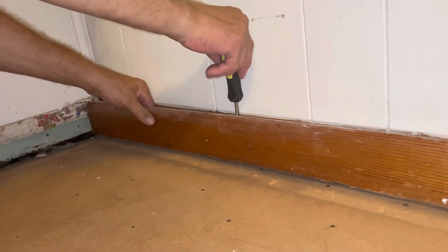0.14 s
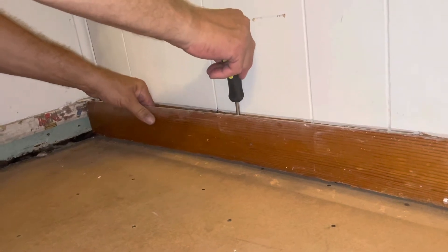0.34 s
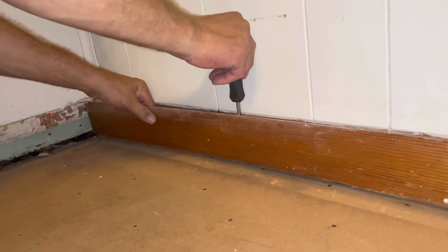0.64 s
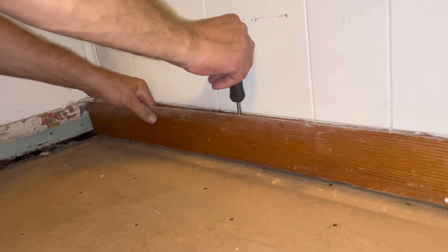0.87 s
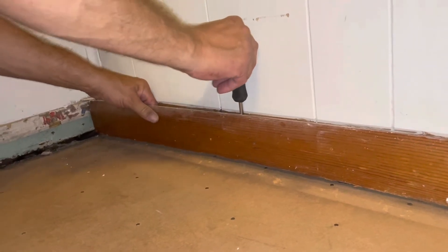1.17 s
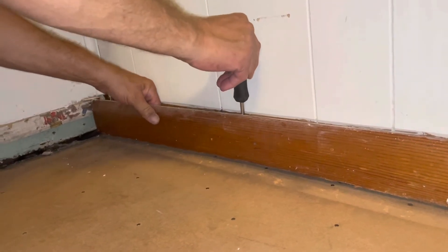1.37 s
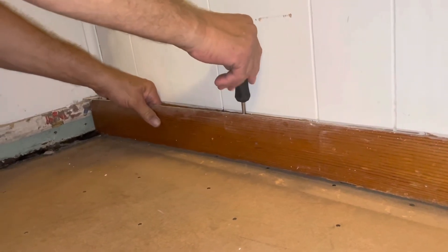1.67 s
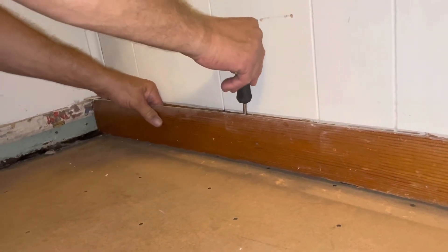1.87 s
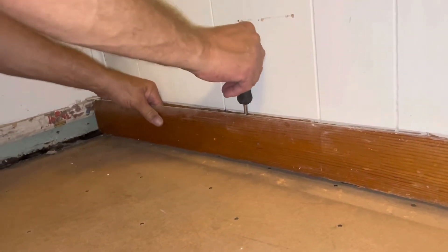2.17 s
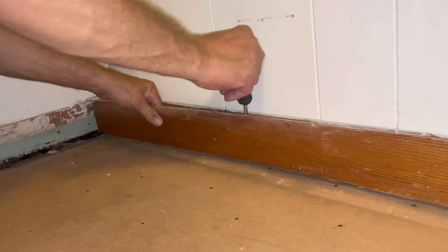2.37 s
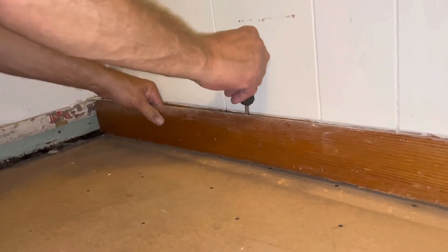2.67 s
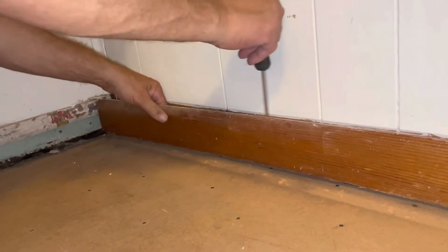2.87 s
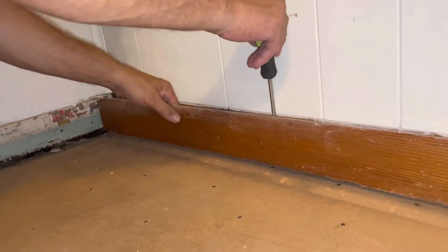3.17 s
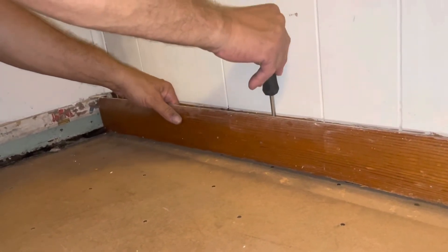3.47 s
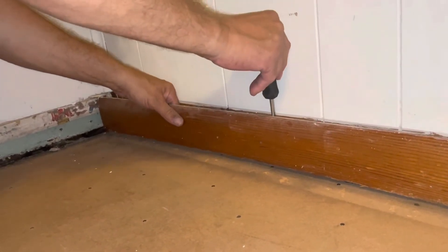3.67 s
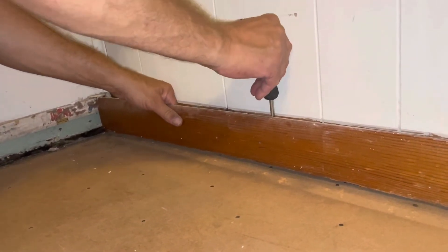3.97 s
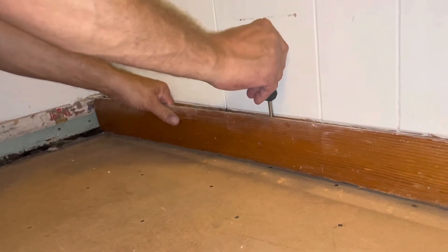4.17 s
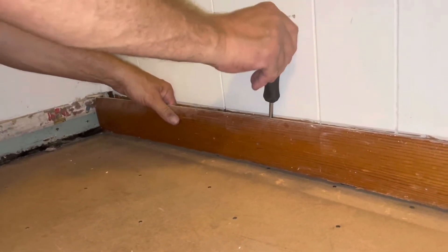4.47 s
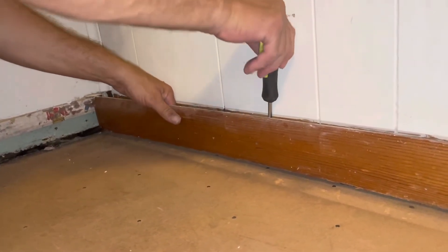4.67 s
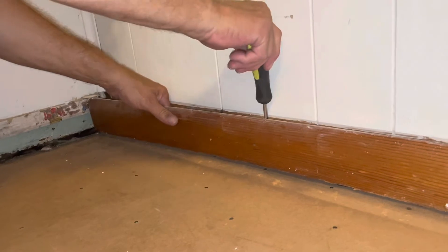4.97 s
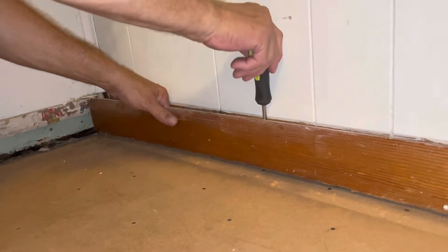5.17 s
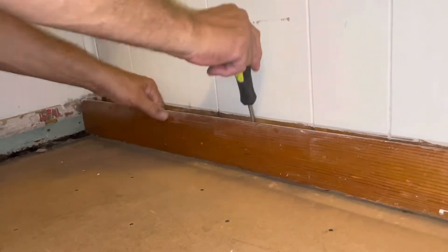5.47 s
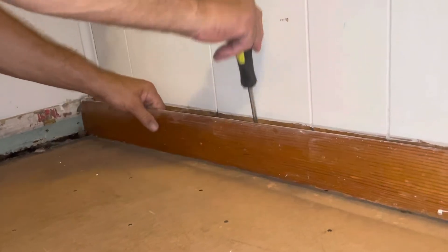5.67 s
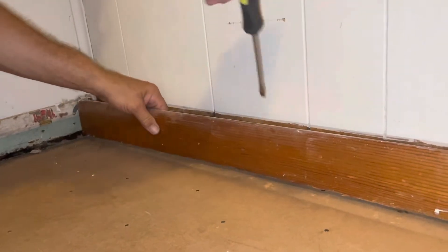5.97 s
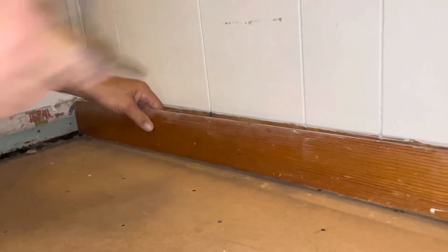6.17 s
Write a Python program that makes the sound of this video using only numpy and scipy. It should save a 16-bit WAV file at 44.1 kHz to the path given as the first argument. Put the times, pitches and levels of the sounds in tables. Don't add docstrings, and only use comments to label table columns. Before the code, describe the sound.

A screwdriver scrapes and ticks behind a wooden baseboard with soft thuds and creaks, then a sharp cracking jolt as a nail lets go.

```python
import sys
import numpy as np
from scipy import signal
from scipy.fft import rfft, irfft, next_fast_len
from scipy.io import wavfile
from scipy.ndimage import uniform_filter1d

SR = 44100
rng = np.random.default_rng(int(sys.argv[2]) if len(sys.argv) > 2 else 0)


def to_wav(s):
    ch = np.atleast_2d(s).T
    pcm = np.round(np.clip(ch, -1, 1) * 32767)
    wavfile.write(sys.argv[1], SR, pcm.astype(np.int16))


def voltage_ratio(decibels):
    exponent = np.asarray(decibels, float) / 20
    return 10 ** exponent


N = 278836
FFT = next_fast_len(N)
TIME_S = np.arange(N) / SR
PIECE = 8192
GRIT_TOP_HZ = 13200


def level(x, db):
    return x * voltage_ratio(db) / np.sqrt(np.mean(x ** 2))


def lowpass(x, order, hz):
    return signal.sosfilt(signal.butter(order, hz, fs=SR, output="sos"), x)


def band(x, hz, width_hz):
    return signal.lfilter(*signal.iirpeak(hz, hz / width_hz, fs=SR), x)


def body(x, modes):
    return sum((-1) ** k * voltage_ratio(db) * band(x, hz, width_hz) for k, (hz, width_hz, db) in enumerate(modes))


def on_log(table, size):
    hz, value = np.transpose(table)
    return np.interp(np.log(np.fft.rfftfreq(size, 1 / SR) + 1), np.log(hz + 1), value)


def walk(rate_hz):
    k = int(SR / rate_hz)
    held = np.repeat(rng.standard_normal(N // k + 1), k)
    return uniform_filter1d(uniform_filter1d(held, k), k)[:N]


def add(out, t_s, piece, peak_db):
    i = int(t_s * SR)
    out[i:i + len(piece)] += (piece * voltage_ratio(peak_db) / np.abs(piece).max())[:N - i]


def burst(t60_s, rise_s):
    t = np.arange(PIECE) / SR
    decay = voltage_ratio(-60 * t / np.clip(t60_s, 0.004, 0.3))
    return rng.standard_normal(PIECE) * (1 - np.exp(-t / rise_s)) * decay


def ring(hz, t60_s):
    push = np.pad(np.hanning(int(0.00031 * SR)), (0, PIECE))
    return band(push, hz, 2.26 / t60_s)


# f/Hz, density/dB per Hz
HOUSE_MID = [(15, -37), (25, -4.5), (64, -2.5), (180, 1), (363, -9), (427, -13), (887, -15), (1070, -18),
             (5140, -34), (6210, -39.5), (7310, -55.5), (9570, -43), (16000, -104)]
# f/Hz, density/dB per Hz
HOUSE_SIDE = [(15, -55), (25, -34), (145, 3.5), (503, -8), (714, -1.5), (3160, -20), (5000, -30.5),
              (6920, -28), (9320, -36), (10700, -85), (16000, -63)]
# f/Hz, width/Hz, level/dB
DUCTS = [(357, 25, -55), (739.4, 17.6, -61), (871, 73, -57)]
# t/s, spread/s, swell/dB
RUMBLE_SWELLS = [(0.98, 0.085, 4.5), (1.48, 0.15, 8.5), (2.08, 0.072, 7), (2.45, 0.37, 5.5), (3.2, 0.18, 3.5),
                 (4.1, 0.26, 1), (4.8, 0.62, 5), (5.2, 0.095, 4), (5.35, 0.072, -30), (5.6, 0.25, 2),
                 (6.1, 0.16, 4.5)]


def house():
    octave = np.log2(np.fft.rfftfreq(FFT, 1 / SR) + 1)
    swell_db = sum(db * np.exp(-0.5 * ((TIME_S - t_s) / spread_s) ** 2) for t_s, spread_s, db in RUMBLE_SWELLS)
    swell = voltage_ratio(1.5 + swell_db)
    pair = []
    for colour, db in ((HOUSE_MID, -40.5), (HOUSE_SIDE, -49.5)):
        noise = rfft(rng.standard_normal(FFT)) * voltage_ratio(on_log(colour, FFT))
        parts = []
        for k in range(4, 15):
            part = irfft(noise * np.clip(1 - abs(octave - k), 0, 1), FFT)[:N]
            parts.append(part * voltage_ratio(1.8 * walk(3.0)))
        rumble, hiss = sum(parts[:3]), sum(parts[3:])
        pair.append(level(swell * rumble + hiss, db))
    ducts = np.zeros((2, N))
    for hz, width_hz, db in DUCTS:
        noise = rng.standard_normal((2, N))
        ducts += level(band(band(noise, hz, width_hz), hz, width_hz), db)
    return pair[0] + pair[1] * np.array([[1], [-1]]) + ducts + 0.4 * ducts[::-1]


def edge(x):
    fine = band(x, 7800, 3200) + band(band(x, 7600, 6000), 13200, 5900)
    return lowpass(fine, 8, GRIT_TOP_HZ)


def grip(x, modes):
    return sum((-1) ** k * voltage_ratio(1.3 * walk(14)) * body(x, [mode]) for k, mode in enumerate(modes))


# f/Hz, width/Hz, level/dB
SHAFT = [(1150, 220, -8.5), (1533, 495, -3), (1650, 154, 0), (2070, 150, -4), (2515, 270, -5.5),
         (3030, 470, -10.5)]
# f/Hz, width/Hz, level/dB
OVERTONE = [(4254, 453, 14.3), (4630, 690, 12.2), (5890, 1100, 2.8)]
# t/s, length/s, level/dB, shaft overtone/dB, fine grit/dB
PUSHES = [(0.897, 0.011, -56, -5, -8), (0.985, 0.0084, -45, -4, -14), (1.024, 0.015, -40, -8, -18),
          (1.056, 0.028, -48.5, -17, -8), (1.169, 0.036, -52, -16, -26), (1.609, 0.05, -44, -5.5, -16.5),
          (1.711, 0.053, -45.5, -10, -26), (1.793, 0.016, -46, -15, -38), (1.905, 0.05, -45.5, -3.5, -16.5),
          (2.04, 0.041, -41, -7.5, -20), (2.31, 0.055, -44.5, -5, -17), (2.522, 0.044, -45.5, -3.5, -42),
          (2.655, 0.056, -51.5, -2.5, -5.5), (2.724, 0.088, -47, -9, -10), (3.01, 0.096, -55, -2, -11.5),
          (3.2, 0.21, -51, -3.5, -11), (5.004, 0.036, -51.5, -10, -33), (5.2, 0.11, -40, -8, -21),
          (6.295, 0.025, -58.5, 3, -3.5)]
# t/s, length/s, level/dB, shaft overtone/dB, fine grit/dB
SLIPS = [(0.051, 0.072, -49.5, -4.5, -22), (0.145, 0.019, -50, -8, -31), (0.417, 0.013, -46, -8, -34),
         (0.45, 0.0089, -56, -16, 5), (0.607, 0.048, -54, -8.5, -17), (0.713, 0.026, -51.5, -2, -21),
         (1.108, 0.04, -45.5, 1, -16), (2.182, 0.071, -51, -2.5, -15), (2.446, 0.052, -49.5, -3.5, -21),
         (2.848, 0.045, -46, -4, -21), (2.92, 0.086, -57, -8, -19), (3.11, 0.1, -57.5, 1.5, -1.5),
         (3.43, 0.14, -52, -6, -13), (3.712, 0.14, -57.5, -16, -20), (4.026, 0.053, -44.5, -6, -14.5),
         (4.15, 0.02, -54, -3.5, -25), (4.18, .05, -60, -3, -3), (4.244, 0.032, -42.5, -17, -29),
         (4.33, 0.11, -55.5, -6, -7), (4.562, 0.14, -57, -4, -11), (4.867, 0.056, -48.5, -8.5, -17.5),
         (5.098, 0.018, -44, -14, -44), (5.78, 0.03, -56, -15, -22), (5.83, 0.12, -65, 0, -3),
         (6.07, 0.2, -67.5, 0.5, -2.5)]


def rub():
    bite_s, bite_db, lift_s, lift_db = 0.015, -24, 0.021, -29
    gain = np.zeros((3, N))
    for strokes, swell_db in ((PUSHES, 6.5), (SLIPS, -6.5)):
        for t_s, length_s, db, over_db, fine_db in strokes:
            length_s = max(length_s, 0.01)
            times = t_s + np.array([-bite_s, 0, length_s, length_s + lift_s])
            i = np.arange(int(times[0] * SR), min(int(times[-1] * SR), N))
            pressure_db = np.interp(i / SR, times, [bite_db, -swell_db / 2, swell_db / 2, lift_db])
            gain[:, i] += voltage_ratio(pressure_db + db + np.array([[0], [over_db], [fine_db]]))
    gain += voltage_ratio(-80.5 + 7.4 * walk(4.1) + np.array([[0], [3.0], [0.5]]))

    size_db = 2.67 * np.minimum(rng.exponential(size=N), 7.5)
    flutter_db = 2.4 * np.tanh(walk(140))
    grit = level(rng.standard_normal(N) * voltage_ratio(size_db + flutter_db), 0)
    catches_per_s, catch_db = 350, 17.5
    grit += voltage_ratio(catch_db) * rng.standard_normal(N) * (rng.random(N) < catches_per_s / SR)
    shaft = gain[0] * level(grip(grit, SHAFT), 0.22)
    overtone = gain[1] * level(grip(grit, OVERTONE), 0.072)
    return shaft + overtone + gain[2] * level(edge(grit), 5.1)


def snap(out, t_s, db, hz, t60_s, treble_db, shaft, rise_s=0.002, fine_db=-9.5):
    push = burst(0.69 * t60_s, rise_s)
    push[int(rise_s * SR)] += 1.6
    add(out, t_s - rise_s, band(push, hz, 5.3 / t60_s) + shaft * body(push, SHAFT), db - 3.5)
    spit = burst(0.41 * t60_s, 0.000067)
    treble = band(body(spit, OVERTONE), 4850, 4000) + voltage_ratio(fine_db) * edge(spit)
    add(out, t_s - 0.0006, treble, db + treble_db + 0.5)


# t/s, peak/dB, ring f/Hz
CRUMBS = [(0.0566, -34, 2420), (0.081, -32, 1200), (0.154, -33, 910), (0.584, -36.5, 1160),
          (0.6507, -37, 2260), (0.7197, -33, 1610), (0.913, -38, 2310), (1.779, -41, 1550),
          (2.2486, -51, 2100), (2.3957, -47, 2280), (2.492, -46, 2200), (4.568, -47, 2140),
          (3.391, -35, 2070), (4.132, -40, 1610), (4.7122, -33, 890), (4.728, -32, 890), (5.093, -42, 2130),
          (5.1086, -36, 2370)]
# t/s, peak/dB, ring f/Hz, treble/dB
CLICKS = [(0.1092, -29, 1460, -6), (0.1989, -34.5, 2790, -9), (0.6115, -31.5, 2140, -9.5),
          (0.6589, -39, 1700, -8), (0.7053, -46, 2110, -11), (1.1024, -41, 1610, -6),
          (1.6427, -33, 2230, -4), (1.7175, -40, 2080, -12), (1.8078, -25.5, 1640, -14),
          (1.8442, -35, 1630, -8), (1.9021, -40, 1520, -11), (2.1819, -36, 1490, -8),
          (2.3151, -39.5, 2100, 2), (2.4493, -43, 1460, -8), (2.5277, -40, 1460, 3),
          (2.6668, -27, 2140, -4), (2.6825, -29, 2230, -9), (5.4141, -25, 1810, -18),
          (5.4255, -20, 2130, -17), (5.505, -31, 1900, -10), (5.558, -34, 2100, -15),
          (5.607, -34, 1500, -19), (3.7083, -31, 2140, -0.5), (0.4484, -38, 1560, 5)]
# t/s, peak/dB, ring f/Hz, treble/dB
TICKS = [(0.417, -25, 1560, -3), (0.4489, -40, 1160, 8), (1.5563, -42, 2190, -2), (1.0321, -28, 1450, 1.1),
         (1.0366, -20.5, 2150, 0), (1.0785, -34, 1990, -1), (1.129, -31, 2100, -2), (1.622, -33, 2200, -8),
         (1.646, -29, 1510, -14), (1.921, -28.5, 1450, -6), (2.0412, -36, 2200, -6),
         (2.203, -28.5, 1150, -10), (2.3574, -24, 1400, -25), (2.56, -22.5, 1510, -11),
         (2.8359, -22.5, 1150, -4), (2.8485, -28, 950, -11), (2.8547, -30, 1050, -3), (2.866, -31, 800, -4),
         (2.8787, -22.5, 930, -22), (4.029, -34, 1180, -12), (4.257, -32, 1460, -8), (5.42, -30, 1500, -16),
         (5.666, -27, 2500, -20), (5.7668, -26, 1070, 5)]


def ticks():
    out = np.zeros(N)
    for t_s, db, hz in CRUMBS:
        snap(out, t_s, db, hz, 0.037, -13, 0.41)
    for t_s, db, hz, treble_db in CLICKS:
        snap(out, t_s, db, hz, 0.019, treble_db, 0.5, rise_s=0.0003, fine_db=-10.5)
    for t_s, db, hz, treble_db in TICKS:
        snap(out, t_s, db, hz, 0.032, treble_db, 0.29)
    return out


# t/s, peak/dB, f/Hz, t60/s
PINGS = [(0.1095, -36, 1460, .015), (0.612, -35.5, 2180, 0.017), (1.808, -30, 1600, .015),
         (1.8085, -31, 2500, .012), (2.0627, -25, 1600, .02), (2.667, -30, 1500, 0.011),
         (2.8362, -24, 2100, .015), (2.8365, -27, 4720, .012), (2.8372, -24, 850, 0.018),
         (2.8367, -21, 1180, .016), (2.8362, -24, 1450, .014), (3.7075, -37, 2090, 0.013),
         (3.7075, -40, 3000, .01), (5.7665, -21, 2130, 0.017), (5.7668, -29, 3030, 0.011),
         (5.7663, -24, 4100, .013), (5.766, -25, 4750, .014), (5.7678, -18, 1070, .02),
         (5.7685, -25, 830, .02)]


def pings():
    out = np.zeros(N)
    for t_s, db, hz, t60_s in PINGS:
        add(out, t_s, ring(hz, t60_s), db)
    return out


# t/s, peak/dB
FLAKES = [(0.417, -67), (0.4484, -51), (0.8964, -71), (0.9877, -63), (1.034, -54), (1.0779, -58),
          (1.1243, -65), (1.5559, -61), (2.0577, -68), (2.1799, -71), (2.2543, -66), (2.3965, -65),
          (2.6668, -55), (2.7317, -67), (2.8345, -61), (3.7065, -50), (4.0512, -61), (4.2567, -72),
          (4.3665, -67), (4.7107, -71), (5.2385, -47), (5.2675, -28), (5.3053, -38), (5.4006, -52),
          (5.4176, -46), (5.7653, -49)]


def flakes():
    out = np.zeros(N)
    for t_s, db in FLAKES:
        spit = band(burst(0.0066, 0.0001), 12500, 9000)
        add(out, t_s, band(spit, 15000, 6000), db + 19)
    return out


# t/s, peak/dB, ring f/Hz, t60/s
THUDS = [(0.421, -33, 187, 0.17), (0.939, -29.5, 70.0, 0.091), (1.046, -23, 109, 0.056),
         (1.13, -30, 221, 0.11), (1.548, -25, 103, 0.35), (2.065, -19.5, 139, 0.13),
         (2.083, -20.5, 51.1, 0.16), (2.158, -25.5, 68, 0.044), (2.361, -20, 170, 0.14),
         (2.388, -21, 63, 0.085), (2.569, -25.5, 199, 0.35), (2.697, -28, 305, 0.46),
         (2.891, -29, 141, 0.22), (4.349, -29.5, 91, 0.35), (4.528, -32.5, 51.1, 0.12),
         (4.82, -29, 64.6, 0.12), (5.072, -26, 106, 0.11), (5.104, -24.5, 70, 0.062),
         (5.769, -26, 300, 0.2)]


def thuds():
    out = np.zeros(N)
    for t_s, db, hz, t60_s in THUDS:
        push = burst(t60_s, 0.0015)
        knock = band(band(push, 230, 240), 230, 240)
        add(out, t_s - 0.003, band(push, hz, 0.42 * hz) + 0.27 * hz / 150 * knock, db - 2.5)
    return out


# t/s, length/s, level/dB, f/Hz
CREAKS = [(0.984, .014, -47, 4250), (0.986, .012, -50, 2100), (1.028, .014, -38, 4300),
          (1.116, .022, -36.5, 1640), (1.106, .04, -44, 4250), (1.612, .018, -41, 2150),
          (1.644, .016, -44, 1500), (1.655, .018, -46, 4100), (1.92, .035, -46, 4400),
          (2.056, .014, -39, 2080), (2.066, .025, -45, 4400), (2.55, .02, -40, 2130),
          (2.745, .06, -46, 1200), (2.76, .04, -50, 1580), (2.745, .04, -51, 2080), (2.784, .02, -43, 810),
          (2.79, .02, -55, 3950), (2.845, .012, -45, 4600), (2.858, .04, -49, 4200),
          (2.845, .045, -44, 2050), (2.845, .07, -42, 360), (2.845, .05, -44, 950), (4.02, .02, -46, 2500),
          (4.03, .02, -48, 4200), (4.242, .022, -40, 1500), (4.245, .018, -45, 2500),
          (5.412, .02, -38, 2000), (5.49, .1, -49, 2100), (5.66, .03, -44, 2100), (5.778, .008, -48, 4400),
          (2.178, .03, -46, 4300), (2.45, .04, -50, 4300), (2.375, .05, -41, 400), (3.07, .12, -57, 5600),
          (3.24, .12, -57, 5400), (3.07, .1, -54, 2050), (2.076, .022, -44, 2600), (3.3, .2, -52, 2050),
          (1.735, .03, -48, 4500)]


def creaks():
    q, rough_db = 11, 3.0
    out = np.zeros(N)
    for t_s, length_s, db, hz in CREAKS:
        chatter = rng.standard_normal(PIECE) * voltage_ratio(rough_db * rng.exponential(size=PIECE))
        hold = np.hanning(int(min(1.4 * length_s, 0.17) * SR))
        chatter = chatter * np.pad(hold, (0, PIECE - len(hold)))
        add(out, t_s - 0.2 * length_s, band(band(chatter, hz, hz / q), hz, 2 * hz / q), db + 8)
    return out


# t/s, peak/dB
TAPS = [
    (1.037, -16.5),
    (2.837, -19),
    (5.767, -20),
]


def taps():
    out = np.zeros(N)
    for t_s, db in TAPS:
        push = burst(0.01, 0.00016)
        add(out, t_s, band(push, 2000, 450) - 1.65 * band(push, 1020, 350), db - 5.5)
    return out


# t/s, peak/dB, f/Hz, t60/s
RINGS = [(5.233, -26, 1850, .03), (5.238, -18, 780, 0.027), (5.2413, -9, 1876, .022),
         (5.2413, -10, 1180, 0.018), (5.2423, -13, 2500, .03), (5.2418, -19, 3400, 0.015),
         (5.244, -9.5, 2104, 0.027), (5.252, -16, 1150, 0.032), (5.2518, -16.5, 2040, .03),
         (5.262, -13, 1210, .02), (5.2627, -16, 856, .03), (5.2685, -3.5, 2140, 0.022),
         (5.2695, -13, 850, .035), (5.2685, -12, 1840, .02), (5.2689, -6, 1178, 0.038),
         (5.269, -16, 3200, .016), (5.275, -22, 331, 0.088), (5.3075, -8.5, 1640, 0.025),
         (5.3078, -10.5, 1010, 0.028), (5.3072, -13, 3010, 0.016), (5.3068, -18, 3590, .016),
         (5.309, -14.5, 1200, .03), (5.309, -14, 309, 0.066)]


def jerk_rings():
    out = np.zeros(N)
    for t_s, db, hz, t60_s in RINGS:
        add(out, t_s, ring(hz, t60_s), db)
    return out


# t/s, face ring peak/dB, board bend/dB
JERKS = [(5.234, -30, -22), (5.2395, -16, -17), (5.2418, -7.5, -13), (5.2452, -12, -9), (5.2518, -15, -9.5),
         (5.2627, -8, -15.5), (5.2684, -10.5, -16.5), (5.2755, -25, -17), (5.2815, -29, -28),
         (5.308, -11, -25), (5.3100, -13, -12), (5.3205, -31, -20.5)]
# f/Hz, width/Hz, level/dB
FACE = [(850, 90, 3.5), (1180, 115, 3.5), (1710, 220, -3), (2140, 69, -13), (3300, 200, -12)]
# f/Hz, width/Hz, level/dB
BOARD = [(91, 8.4, 7), (197, 91, -6.5), (314, 44, 3), (510, 74, -8.5), (934, 160, -2.5)]


def jerks():
    out = np.zeros(N)
    bend = np.pad(np.hanning(int(0.0014 * SR)), (0, PIECE))
    for k, (t_s, db, bend_db) in enumerate(JERKS):
        add(out, t_s, body(burst(0.0038, 0.00053), FACE), db)
        add(out, t_s, (-1) ** k * body(bend, BOARD), bend_db + 1.5)
    return out


# t/s, peak/dB, centre f/Hz, width/Hz, t60/s
SPLINTERS = [(5.2368, -21, 9000, 6000, .02), (5.2387, -16.5, 4200, 3000, .02),
             (5.245, -24, 4500, 4000, .05), (5.284, -32, 4500, 4000, .15),
             (5.241, -19, 10000, 5000, 0.0093), (5.241, -8.5, 4950, 2500, 0.012),
             (5.2495, -20, 9000, 7000, .03), (5.2518, -18, 10000, 6000, 0.019),
             (5.256, -22, 4000, 2500, 0.012), (5.263, -28, 4200, 2500, .015),
             (5.268, -4, 11000, 9000, 0.017), (5.268, -17, 4500, 4000, .014),
             (5.27, -24, 11000, 6000, 0.018), (5.279, -28, 10500, 4000, 0.085),
             (5.314, -28, 10400, 4500, 0.36), (5.3066, -3.5, 5640, 5000, 0.018),
             (5.3056, -22, 9600, 5000, 0.023), (5.311, -22, 4500, 4000, .025),
             (5.321, -26, 5030, 3000, .03)]


def splinters():
    out = np.zeros(N)
    for t_s, db, hz, width_hz, t60_s in SPLINTERS:
        split = band(burst(t60_s, 0.00053), hz, width_hz)
        add(out, t_s, band(split, hz, 1.2 * width_hz), db)
    return out


# t/s, level/dB
SLIDE = [
    (5.317, -29),
    (5.323, -28.5),
    (5.401, -34),
    (5.427, -30.5),
    (5.437, -36.5),
    (5.55, -37),
    (5.677, -42),
    (5.74, -53),
]
# f/Hz, density/dB per Hz
SLIDE_COLOUR = [(180, -44), (300, -3), (336, -7), (750, -6), (853, 2), (2350, -8.5), (6270, -10.5),
                (7970, -19), (10000, -32), (12500, -30), (14000, -60)]


def slide():
    t_s, db = np.transpose(SLIDE)
    size_db = 2.7 * np.minimum(rng.exponential(size=N), 7)
    grains = rng.standard_normal(N) * voltage_ratio(size_db + 3.5 * walk(110))
    rush = irfft(rfft(grains, FFT) * voltage_ratio(on_log(SLIDE_COLOUR, FFT)), FFT)[:N]
    face = level(band(grains, 1650, 1600), -8)
    return (level(rush, -4.5) + face) * voltage_ratio(np.interp(TIME_S, t_s, db, -99, -99))


# t/s, level/dB
BRUSH = [
    (5.85, -58),
    (5.89, -46.5),
    (6.14, -53),
    (6.27, -59),
    (6.3, -59),
    (6.33, -47),
]
# f/Hz, width/Hz, level/dB
VARNISH = [(1256, 130, 6), (3270, 320, -3), (5270, 360, -13)]


def brush():
    t_s, db = np.transpose(BRUSH)
    skin = level(body(rng.standard_normal(N), VARNISH), 0)
    return skin * voltage_ratio(np.interp(TIME_S, t_s, db, -99) + 2.3 * walk(43))


# f/Hz, left minus right/dB
TILT = [(60, -3), (110, -3.5), (200, 0.5), (380, -4), (700, -1.5), (1290, -1.5), (2380, 4), (4400, 3.5),
        (8120, -4), (15000, -9)]
# f/Hz, left lead/rad
LEAD = [(20, -1), (1200, 1.37), (2000, 1.01), (4500, 1), (6000, -1.48), (7500, -2.5), (9300, -5),
        (11000, -6), (14500, -10.5), (17000, -18)]


def ports(x):
    half = voltage_ratio(on_log(TILT, FFT) / 2) * np.exp(0.5j * on_log(LEAD, FFT))
    return irfft(rfft(x, FFT) * np.array([half, 1 / half]), FFT)[:, :N]


def room(blade, nail):
    t = np.arange(SR // 2) / SR
    tail = rng.standard_normal((2, len(t))) * voltage_ratio(-60 * t / 0.28) * np.clip(t / 0.00083, 0, 1)
    tail = signal.lfilter(*signal.butter(1, 4400, fs=SR), tail)
    tail = (tail + 0.38 * tail[::-1]) / np.sqrt(np.sum(tail ** 2) / 2)
    early = rng.standard_normal((2, len(t))) * voltage_ratio(-60 * t / 0.012)
    early = early / np.sqrt(np.sum(early ** 2) / 2)
    send = voltage_ratio(-16.5) * blade + voltage_ratio(-20.5) * nail
    wet = signal.fftconvolve(send[None], tail, axes=1)[:, :N]
    return wet + voltage_ratio(-14.5) * signal.fftconvolve(nail[None], early, axes=1)[:, :N]


def scene():
    hum = house()
    blade = rub() + ticks() + pings() + flakes() + thuds() + creaks() + taps()
    nail = jerk_rings() + jerks() + splinters() + slide() + brush()
    nail = lowpass(nail, 6, GRIT_TOP_HZ)
    return ports(blade + nail) + room(blade, nail) + hum


def low_pass(x):
    return signal.sosfilt(signal.butter(12, 17320, fs=SR, output="sos"), x)


# f/Hz, width/Hz, share
NULLS_MID = [(6850, 690, 0.66), (7390, 500, 0.58), (7660, 410, 0.53), (12770, 9800, 0.63),
             (16000, 3000, 0.56)]
# f/Hz, width/Hz, share
NULLS_SIDE = [(10900, 1500, 0.89), (12100, 4300, 0.97)]


def record(dry):
    dry = signal.sosfilt(signal.butter(4, 40.4, "high", fs=SR, output="sos"), dry)
    dry = lowpass(np.clip(dry, -3, 3), 4, 14500)
    dry = signal.sosfilt(signal.ellip(8, 0.2, 60, 16500, fs=SR, output="sos"), dry)
    for nulls, sign in ((NULLS_MID, 1), (NULLS_SIDE, -1)):
        for hz, width_hz, share in nulls:
            lost = share * band(dry[0] + sign * dry[1], hz, width_hz) / 2
            dry = dry - lost * np.array([[1], [sign]])
    peak = 1.05
    mix = peak * np.tanh(dry / peak)
    return low_pass(mix)


dry = scene()
out = record(dry)
to_wav(out)
```